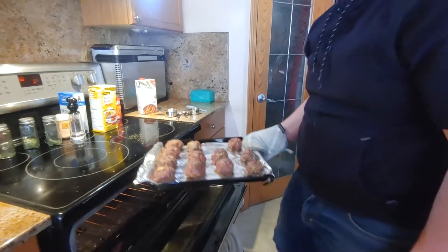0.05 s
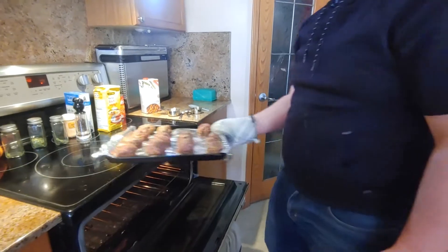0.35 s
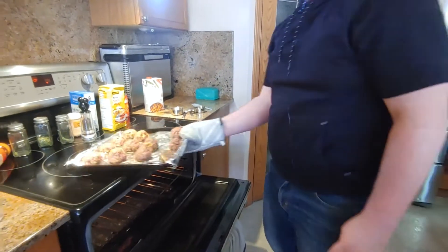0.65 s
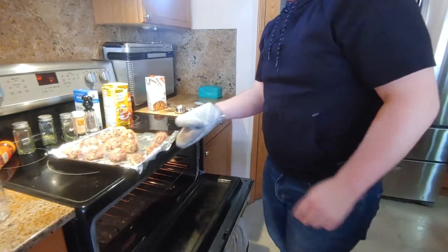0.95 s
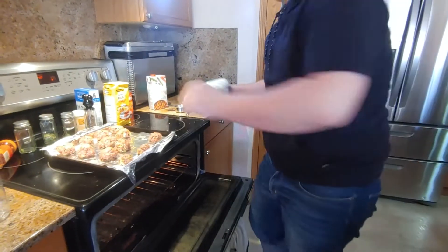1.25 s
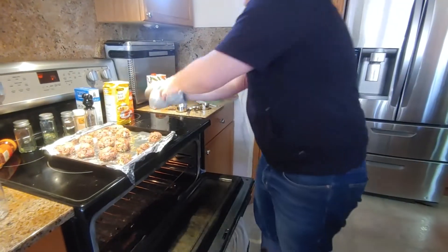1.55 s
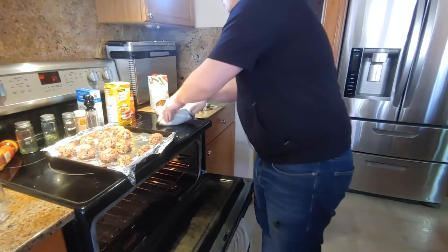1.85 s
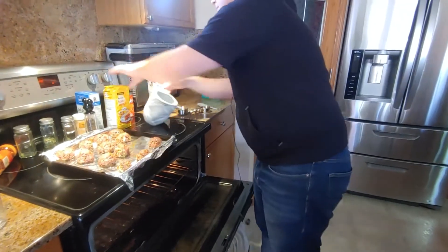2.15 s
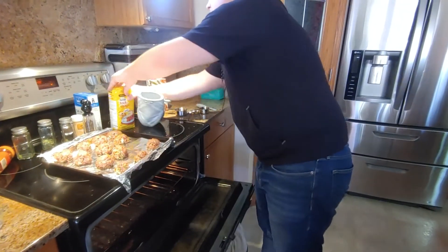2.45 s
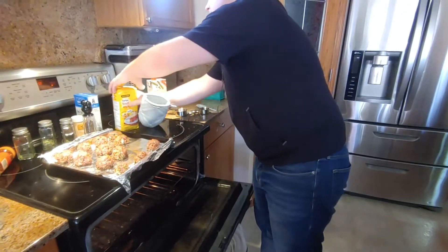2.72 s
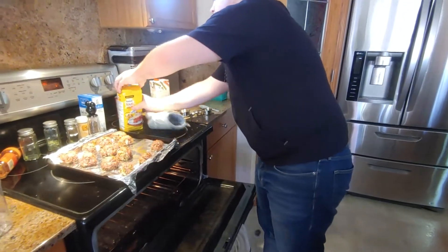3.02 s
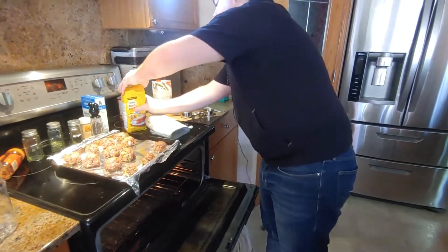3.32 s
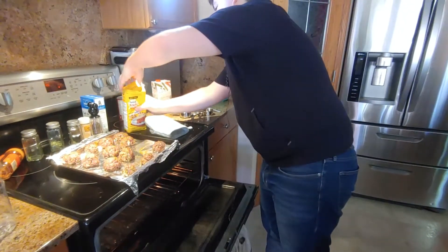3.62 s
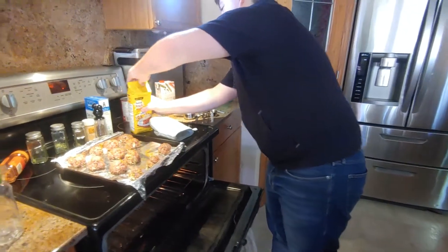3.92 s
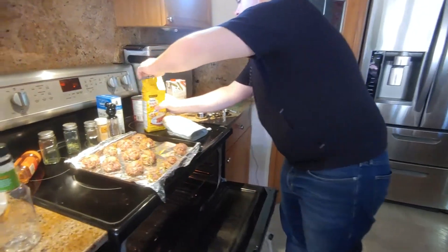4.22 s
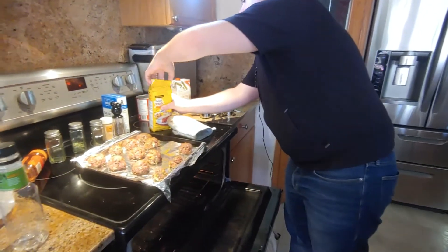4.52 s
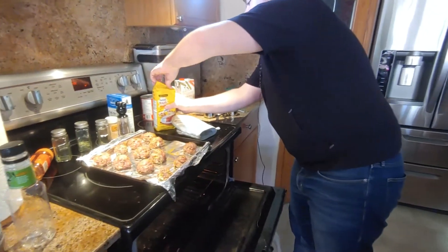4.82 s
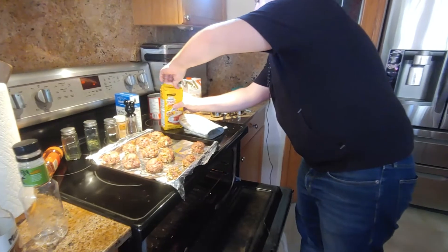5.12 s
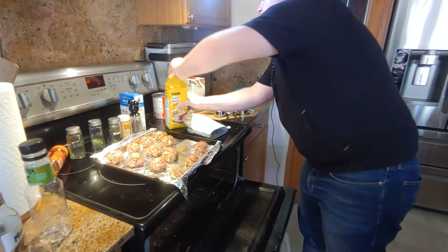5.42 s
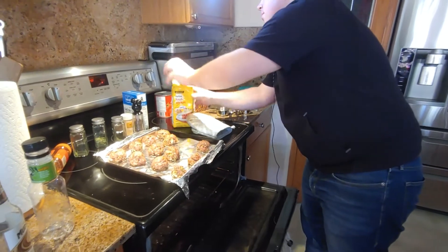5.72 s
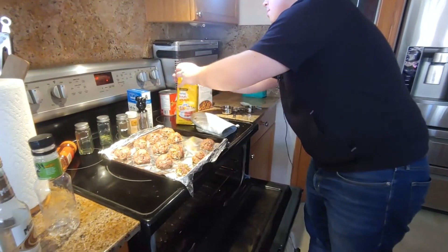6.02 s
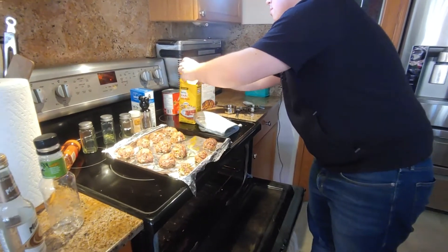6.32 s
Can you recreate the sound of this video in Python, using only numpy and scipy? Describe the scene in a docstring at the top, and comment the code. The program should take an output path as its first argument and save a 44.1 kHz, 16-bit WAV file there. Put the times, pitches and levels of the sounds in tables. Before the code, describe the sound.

In a kitchen, a foil-lined tray clanks and slides, followed by soft thuds and the crackling and ripping of a cardboard flap.

```python
"""In a small kitchen, a foil-lined baking tray is set down on a glass hob, slid back and let go.
Its steel rattles and rings, and the foil crinkles. An oven mitt is pulled off with a rustle and
dropped with a thud. Then a cardboard box is gripped and rubbed; its flap snaps as it creases and
tears open in short rips, fibre by fibre. The oven fan runs underneath and the room echoes."""
import sys
import numpy as np
from scipy import signal
from scipy.fft import rfft, irfft, next_fast_len
from scipy.io import wavfile
from scipy.ndimage import map_coordinates

SR = 44100
rng = np.random.default_rng(int(sys.argv[2]) if len(sys.argv) > 2 else 0)


def materialize(psi):
    """Save the field psi as 16-bit PCM at rate SR to the path in sys.argv[1].

    A 1-D psi becomes a single channel; in a 2-D psi each row is a channel.
    """
    bounded = np.clip(np.atleast_2d(psi).T, -1, 1)
    quanta = np.round(bounded * 32767).astype(np.int16)
    wavfile.write(sys.argv[1], SR, quanta)


N = 289334

# Levels are relative: each source adds its own gain. A decay (t60) is the time to fade by 60 dB.
# The tray hits the hob. Each row: time in seconds, level in dB, treble in dB,
# rattle decay in seconds, ring in dB, pitch in Hz that the contact point favours.
TRAY_HITS = [(0.6296, 6, 0, 0.022, -8, 2200), (0.639, -12, -2, .09, -7, 2900),
             (.6900, 1, 3.5, 0.052, -6, 850), (0.7397, -1, -8, 0.016, -1, 695),
             (.797, -14.5, -3, 0.3, -4, 2800), (1.0059, 1, 7, 0.041, 1, 860),
             (1.015, -6, -3, 0.14, -2, 1250), (1.052, -17.5, -3, 0.12, 14.5, 1230),
             (1.1652, -9.5, 0, 0.12, -2, 1260)]
# The steel's ringing tones. Each row: pitch in Hz, level in dB, decay in seconds.
TRAY_MODES = [(266.4, -2, 0.24), (351, 0.5, 0.12), (434.5, -2, 0.42), (494, -7, 0.26), (540, -26, 0.27),
              (706, -3, 0.4), (805, -0.5, 0.31), (846, 8, 0.055), (1030, -11, 0.14), (990, -5, 0.36),
              (1164, -1, 0.23), (1220, 8.5, 0.11), (1330, -11, 0.33), (1700, -17, 0.48), (1970, -9, 0.4),
              (2245, -15, 0.31), (2930, -20, 0.2), (3370, -1, 0.12), (3580, -15, 0.17)]
# The foil flexes as the tray lands, stops and is let go. Each row: time in seconds, level in dB,
# fade in seconds.
FOIL_FLEXES = [(.64, -30.5, 0.12), (1.009, -22, 0.054), (1.2, -33, 0.056)]
# The card buckles. Each row: time in seconds, crack, flap ring and treble in dB, decay in seconds.
SNAPS = [(3.034, -20.5, -25.5, 1, 0.033), (3.052, -19.5, -22.5, -1, .025), (3.095, -30.5, -39, 16, 0.034),
         (3.151, -27.5, -35.5, 2, 0.067), (3.322, -28, -27, -6, 0.053), (3.392, -35, -28, -14, 0.037),
         (3.4663, -21.5, -30, 15, 0.054), (3.489, -23, -24, -4, 0.05), (3.524, -20, -15.5, -15, 0.03),
         (3.562, -18.5, -19, -24, 0.043), (3.697, -22.5, -35, -8, 0.04), (3.77, -24, -22, -11, 0.066),
         (3.848, -19.5, -24, 2, 0.029), (3.856, -14, -22, 10, .02), (3.918, -24.5, -36, -24, 0.029),
         (3.959, -15, -23.5, -1, 0.03), (3.975, -18, -25, -8, .03), (4.022, -19.5, -17, -6, 0.037),
         (4.227, -34, -51, -4, 0.044), (4.398, -25.5, -27, -14, 0.028), (4.418, -21.5, -18, -8, 0.031),
         (4.457, -21, -23, -7, 0.052), (4.475, -25, -30, -10, .035), (4.485, -17.5, -25, 0, 0.0091),
         (4.524, -17.5, -21, -15, 0.024), (4.56, -22, -22.5, -12, 0.014), (4.602, -23.5, -26, -20, 0.062),
         (4.628, -19, -26, -10.5, 0.094), (4.787, -29.5, -34.5, -6, 0.095), (4.824, -22, -47, -2, 0.035),
         (4.838, -29, -32, -2, 0.038), (5.004, -22.5, -24.5, -11, 0.11), (5.038, -20, -37, 4, 0.043),
         (5.054, -21, -47, 12, 0.015), (5.322, -20, -19.5, -19, .035), (5.335, -16, -16.5, 2, 0.042),
         (5.411, -27.5, -17.5, -25, 0.034), (5.5005, -20, -30, 1, 0.023), (5.537, -20, -27.5, -8, 0.032),
         (5.629, -26, -31.5, -7, 0.029), (5.887, -23, -25, -11, 0.041), (6.025, -27, -29, -17, 0.023),
         (6.098, -30.5, -21, 2, 0.078), (6.108, -21, -26, -24, 0.021), (6.241, -21, -19.5, -6, 0.039),
         (6.252, -15, -18.5, -12, 0.028), (6.3238, -25, -25.5, 14, 0.011), (6.35, -22.5, -23.5, 6, 0.1),
         (6.404, -23.5, -31, -10, 0.014), (6.428, -12.5, -29, -15, 0.026), (6.452, -27, -23.5, -2, 0.026),
         (6.495, -23, -25, -20, .02), (6.521, -24, -36, -1, .027)]
# The glued flap tears. Each row: start and end in seconds, level in dB, pull on the box in dB.
RIPS = [(3.489, 3.542, -14.5, -7.5), (3.718, 3.995, -32, -21), (3.958, 3.976, -20.5, -16),
        (5.001, 5.042, -21.5, -12), (5.092, 5.294, -24, -26), (5.127, 5.133, -15.5, -22),
        (5.201, 5.237, -16.5, -42), (5.309, 5.375, -22, -8), (5.313, 5.343, -28.5, -4)]
# Fingers tap the box. Each row: time in seconds, flap ring in dB, hollow knock in dB.
TAPS = [(2.502, -37, -34), (2.5445, -24, -35.5), (2.568, -29, -52), (2.691, -26.5, -37),
        (2.832, -34.5, -48), (2.982, -31, -44), (3.109, -24.5, -28), (3.157, -29, -27), (3.184, -26.5, -39),
        (3.865, -41, -26.5), (4.049, -28, -41), (4.078, -23.5, -29), (4.121, -43, -27), (4.513, -41, -26.5),
        (4.978, -35, -54), (5.727, -34, -31), (5.779, -23.5, -33), (6.055, -29, -41)]
# Fingers drag over the card. Each row: start and end in seconds, rub in dB, scratch in dB.
STROKES = [(2.421, 2.896, -45.5, -44), (3.014, 3.056, -35, -42), (3.327, 3.43, -46, -38),
           (3.631, 3.659, -43, -47), (3.711, 4.031, -35.5, -31), (4.444, 4.666, -37, -36.5),
           (4.788, 4.903, -41.5, -38), (4.95, 4.998, -39.5, -39), (5.012, 5.189, -54, -33),
           (5.208, 5.258, -37.5, -24.5), (5.305, 5.457, -39.5, -34.5), (5.537, 5.622, -39.5, -39),
           (5.715, 5.797, -34.5, -34), (5.831, 5.894, -44, -32), (6.057, 6.283, -36, -39),
           (6.347, 6.537, -30.5, -37.5)]
HOLDING_STROKE = (2.5, 6.56, -53.5, -45.5)  # one long, faint row: the hands never keep still
# Soft bumps of mitt, hands and box. Each row: time in seconds, level in dB, pitch in Hz,
# puff decay in seconds.
BUMPS = [(.062, -29, 101, .09), (0.138, -24.5, 175, 0.15), (1.031, -21, 200, 0.08), (1.187, -13, 141, .11),
         (1.316, -17.5, 116, .065), (1.69, -12.5, 345, 0.24), (1.697, -12, 118, 0.22),
         (1.699, -16.5, 650, 0.061), (1.877, -13, 785, 0.12), (2.092, -22.5, 58, .1),
         (2.546, -12, 282, 0.077), (3.065, -37, 107, .25), (3.158, -16.5, 363, 0.24),
         (4.634, -20, 112, 0.059)]
# Tugs at the mitt. Each row: time in seconds, level in dB, swell and fade time in seconds.
MITT_TUGS = [(1.3, -35.5, 0.017), (1.58, -33.5, 0.1), (1.889, -35, 0.077), (2.33, -39.5, 0.16)]
# Sharp little ticks as mitt and clothes move. Each row: time in seconds, level in dB.
CLOTH_TICKS = [(0.083, -16), (.449, -18), (1.3175, -5), (1.525, -16), (1.563, -15), (1.579, -12.5),
               (1.597, -21), (1.633, -22), (2.117, -20)]

# How loudness changes. Each row: time in seconds, level in dB.
SLIDE_LEVEL = [(.78, -48), (.84, -37), (.9, -21), (.96, -24), (1.0, -15.5), (1.04, -27), (1.13, -31),
               (1.22, -51)]
RUMBLE_LEVEL = [(0.0, -46), (0.55, -49), (1.11, -45.5), (2.57, -46), (2.98, -44), (4.13, -52.5),
                (4.68, -49.5), (5.37, -53.5), (5.79, -45.5), (6.56, -56)]

# Modes are the pitches a thing rings at. Each row: pitch in Hz, width in Hz, level in dB.
SLIDE_MODES = [(357, 37, -17), (520, 58, -4.5), (717, 55, 4), (810, 34, -8), (1090, 340, -21),
               (2500, 420, -25)]  # tray sliding on glass
BOX_MODES = [(258, 42, 10), (399, 165, 15), (537, 34, 9.5)]  # hollow box
PANEL_MODES = [(925, 28, 3.5), (1185, 120, -22.5), (1522, 14, 5.5), (3130, 73, -9), (3595, 120, 0),
               (5500, 23, -3), (6860, 57, -50)]  # card walls
FLAP_MODES = [(958, 280, 8), (1145, 150, -6), (1370, 150, -5), (1582, 108, 1.5), (2013, 76, 2)]  # box flap
TORN_EDGE_MODES = [(2660, 310, 6), (3600, 350, -6), (4900, 480, 15), (5930, 1700, 4), (7600, 820, -17),
                   (10800, 2600, 4)]

# A colour is a sound's balance from bass to treble. Each row: frequency in Hz, level in dB.
CLANK_COLOUR = [(40, -23), (140, -2.5), (230, -1.5), (430, 2), (780, 4.5), (1250, -2.5), (1900, -4.5),
                (2900, -5.5), (3700, -9.5), (5000, -17.5), (9000, -27), (16000, -36)]  # steel on glass
FOIL_COLOUR = [(900, 0.5), (2500, -0.5), (5000, -1.5), (7200, 3), (9500, -7.5), (12000, -1), (16000, -20.5)]
SNAP_COLOUR = [(400, -69), (1200, -27), (2300, -3.5), (3600, 1), (5800, 5), (8000, -3), (11000, -5),
               (16000, -18)]
RIP_COLOUR = [(100, -47), (250, -39), (450, -10), (650, -23), (1000, -3.5), (2300, -7), (4000, -3),
              (6000, 2), (8200, -3.5), (11000, -5.5), (16000, -11)]
RUB_COLOUR = [(150, -19), (350, 7.5), (650, -2), (1000, 4.5), (1600, 2.5), (3000, 1), (8000, -47)]
SCRATCH_COLOUR = [(1200, -21.5), (3500, 4.5), (5600, 13), (8000, 4.5), (11000, 5), (16000, -8)]
CLOTH_COLOUR = [(700, 2), (1800, -1), (4000, -1.5), (6800, -3.5), (9000, -9), (12000, -18), (16000, -39)]
TICK_COLOUR = [(700, -6), (4500, -1), (7000, 4.5), (9500, -6.5), (16000, -25.5)]
FAN_COLOUR = [(40, -15), (100, -10.5), (200, -11.5), (350, -14), (700, 0), (1100, -4.5), (2200, -19.5),
              (3500, -14.5), (6000, -11), (10000, -14), (14000, -50), (16000, -40)]
RUMBLE_COLOUR = [(20, 2), (60, -0.5), (130, -2), (220, -10.5), (330, -4), (600, -14), (1500, -25)]

# How long the kitchen echoes. Each row: frequency in Hz, decay in seconds.
ROOM_DECAY = [(100, 0.43), (800, 0.22), (4000, 0.21), (14000, 0.1)]

KNOCK_DB = -13  # the box knocks more softly than the flap rings


def tray(ring_db=-12, clank_db=1, buzz_db=-22, buzz_t60=0.76, focus_db_per_octave=6):
    """Steel rattles briefly on glass at each hit; the sheet rings on and the foil buzzes with it."""
    out, t = np.zeros(N), np.arange(SR * 2 // 3) / SR
    for s, db, bright_db, t60, sheet_db, focus_hz in TRAY_HITS:
        rattle = rng.standard_normal(len(t)) * (dying(t, t60) + amp(buzz_db) * dying(t, buzz_t60))
        clank = amp(clank_db) * peaked(coloured(rattle, CLANK_COLOUR, bright_db))
        ring = np.zeros(len(t))
        for hz, mode_db, mode_t60 in TRAY_MODES:
            gain = amp(mode_db + rng.normal() - focus_db_per_octave * abs(np.log2(hz / focus_hz)))
            ring += gain * dying(t, mode_t60) * np.sin(2 * np.pi * (hz * t + rng.random()))
        add(out, s, amp(db) * (clank + amp(ring_db + sheet_db) * ring / 2))
    return out


def slide():
    """The tray judders over the glass, and the tiny slips make it sing."""
    slips = grains(per_s=840, spread_db=-0.5)
    return level_curve(SLIDE_LEVEL) * unit(resonate(slips, SLIDE_MODES))


def foil(crinkle_db=-1, carry_db=-36.5, fade_db_per_s=9, lands_s=0.63, swell_s=0.06):
    """The foil lining shivers while carried and crinkles at each jolt of the tray."""
    carried = amp(carry_db - fade_db_per_s * np.arange(N) / SR) * gesture(0, lands_s, swell_s, swell_s)
    flexes = [amp(db) * gesture(s, s, swell_s, fall_s) for s, db, fall_s in FOIL_FLEXES]
    crinkle = unit(coloured(grains(per_s=8200, spread_db=10), FOIL_COLOUR))
    return amp(crinkle_db) * np.max([carried] + flexes, axis=0) * crinkle


def snaps():
    """The card creaks under the thumbs, pops and springs back."""
    out = np.zeros(N)
    for s, crack_db, flap_db, bright_db, t60 in SNAPS:
        for delay_s, db in [(-0.011, -24.5), (0, 0), (0.0105, -13)]:  # creak, pop, rebound
            snap = buckle(crack_db, flap_db, flap_db + KNOCK_DB, flap_hz(s), bright_db, t60)
            add(out, s + delay_s, amp(db) * snap)
    return out


def buckle(crack_db, flap_db, knock_db, focus_hz, bright_db, t60, attack_s=0.00024, plain_bright_db=-8):
    """A crease cracks and its fibres settle; the flap rings and the hollow box knocks."""
    t = np.arange(SR // 12) / SR
    spike = amp(5) * dying(t, t60=0.0014)
    settling = amp(-19) * dying(t, t60=0.024)
    strain = spike + dying(t, t60) + settling
    fibres = rng.standard_normal(len(t)) * strain * (1 - np.exp(-t / attack_s))
    crack = coloured(fibres, SNAP_COLOUR, bright_db - plain_bright_db)
    crease_hz = 4000 * np.exp(0.29 * rng.normal())  # each crease has its own pitch
    crack = card_panels(crack) + resonate(crack, [(crease_hz, 450, 5)])
    flap = resonate(fibres, gripped(FLAP_MODES, spread_db=6.5, detune=0.037))
    flap = resonate(flap, [(focus_hz, 650, 0)])
    knock = resonate(fibres, gripped(BOX_MODES, spread_db=8, detune=0.07))
    knock = resonate(knock, [(450, 230, 0)])
    return amp(crack_db) * struck(crack) + amp(flap_db) * struck(flap) + amp(knock_db) * struck(knock)


def flap_hz(s, shut_hz=1016, open_hz=1490, opens_s=5.95):
    """The flap rings higher once it is free."""
    return shut_hz if s < opens_s else open_hz


def gripped(modes, spread_db, detune):
    """The grip shifts each mode's pitch and strength, at random for each blow."""
    return [(hz * np.exp(detune * rng.normal()), width, db + spread_db * rng.normal())
            for hz, width, db in modes]


def card_panels(x):
    """The card's panels ring along with whatever shakes them."""
    return x + resonate(x, PANEL_MODES)


def rips(rise_s=0.0027, fall_s=0.0058, knock_db=-5):
    """Each short rip parts the fibres and shakes the flap and box."""
    tear = tearing()
    tugs = grains(per_s=450, spread_db=6)
    body = resonate(tugs, FLAP_MODES) + amp(knock_db) * resonate(tugs, BOX_MODES)
    body = unit(resonate(body, [(960, 1500, 0)]))
    return sum(amp(db) * gesture(start, end, rise_s, fall_s) * (tear + amp(body_db) * body)
               for start, end, db, body_db in RIPS)


def tearing(shift_db=6, shifts_per_s=45):
    """Fibres break by the thousand; the torn edge changes colour as the tear travels."""
    breaks = coloured(grains(per_s=3200, spread_db=4), RIP_COLOUR)
    edge = np.zeros(N)
    for mode in TORN_EDGE_MODES:
        drift = np.clip(wobble(shifts_per_s), -2, 2)
        edge += resonate(breaks, [mode]) * amp(shift_db * (drift - 4.5))
    return unit(card_panels(breaks) + edge)


def taps(crack_db=-38.5, bright_db=-7, t60=0.038):
    """Fingers shift their grip: soft skin sounds the flap and box but hardly cracks the card."""
    out = np.zeros(N)
    for s, flap_db, knock_db in TAPS:
        add(out, s, buckle(crack_db, flap_db, knock_db, flap_hz(s), bright_db, t60))
    return out


def fingers(gain_db=-1):
    """Fingertips drag over the box with a low rub and a high scratch."""
    rub_level, scratch_level = np.zeros(N), np.zeros(N)
    for start, end, rub_db, scratch_db in STROKES + [HOLDING_STROKE]:
        stroke = gesture(start, end, rise_s=0.013, fall_s=0.044)
        rub_level = np.maximum(rub_level, amp(rub_db) * stroke)
        scratch_level = np.maximum(scratch_level, amp(scratch_db) * stroke)
    rub = unit(card_panels(coloured(grains(per_s=900, spread_db=5.5), RUB_COLOUR)))
    scratch = unit(card_panels(coloured(grains(per_s=2500, spread_db=7.5), SCRATCH_COLOUR)))
    return amp(gain_db) * (rub_level * rub + scratch_level * scratch)


def crackle(per_s=28, gain_db=1.5, spread_db=3.5, bright_db=-7, flap_db=-1, t60=0.029):
    """Small creases give at random under each stroke, louder when the stroke is firm."""
    out = np.zeros(N)
    for start, end, rub_db, scratch_db in STROKES:
        for slot in np.arange(start, end, 1 / per_s):
            s = rng.uniform(slot, min(slot + 1 / per_s, end))
            size = amp(gain_db + spread_db * rng.normal())
            crease = buckle(scratch_db, rub_db + flap_db, rub_db + KNOCK_DB, flap_hz(s), bright_db, t60)
            add(out, s, size * crease)
    return out


def bumps(damping=0.98, puff_db=-6, push_db=-1, push_cycles=3):
    """Each padded blow is a dull push that dies in a few cycles, plus a puff of noise."""
    out, t = np.zeros(N), np.arange(SR // 3) / SR
    for s, db, hz, t60 in BUMPS:
        body = [(hz, damping * hz, 0)]
        push = np.sin(2 * np.pi * hz * t) * dying(t, push_cycles / hz) * (1 - np.exp(-2 * hz * t))
        burst = rng.standard_normal(len(t)) * dying(t, t60)
        puff = resonate(resonate(burst, body), body)
        add(out, s, amp(db) * (amp(push_db) * peaked(push) + amp(puff_db) * peaked(puff)))
    return out


def mitt(cloth_db=-1, tick_db=1, tick_t60=0.0048):
    """Cloth drags over the hand at each tug, with a few sharp ticks."""
    drag = sum(amp(db) * gesture(s, s, swell, swell) for s, db, swell in MITT_TUGS)
    out = amp(cloth_db) * drag * unit(coloured(grains(per_s=10000, spread_db=11.5), CLOTH_COLOUR))
    t = np.arange(SR // 20) / SR
    for s, db in CLOTH_TICKS:
        burst = rng.standard_normal(len(t)) * dying(t, tick_t60)
        add(out, s, amp(db + tick_db) * peaked(coloured(burst, TICK_COLOUR)))
    return out


def oven_fan(fan_db=-44, rumble_db=6):
    """The fan's steady rush of air, over a low rumble that slowly rises and falls."""
    rush = unit(coloured(rng.standard_normal(N), FAN_COLOUR))
    rumble = unit(coloured(rng.standard_normal(N), RUMBLE_COLOUR))
    return amp(fan_db) * rush + amp(rumble_db) * level_curve(RUMBLE_LEVEL) * rumble


def kitchen_echo(x, delay_s=0.006, patterns=8):
    """The room echoes: treble dies first, and the echo pattern shifts as the cook moves."""
    out = np.zeros(N)
    for k in range(patterns):
        hz, t, noise = signal.stft(rng.standard_normal(SR // 2), SR, nperseg=256)
        fade = np.exp(-np.log(1000) * t / along(ROOM_DECAY, hz)[:, None])
        tail = signal.istft(noise * fade, SR, nperseg=256)[1]
        start, end = k * N // patterns, (k + 1) * N // patterns
        add(out, start / SR + delay_s, signal.fftconvolve(x[start:end], tail / np.linalg.norm(tail)))
    return out


def amp(db):
    """Turn decibels into a gain."""
    return 10 ** (np.asarray(db) / 20)


def unit(x):
    """Scale to an average level (rms) of 1."""
    return x / np.sqrt(np.mean(x ** 2) + 1e-20)


def peaked(x):
    """Scale to a peak of 1."""
    return x / (np.abs(x).max() + 1e-20)


def struck(x, window_s=0.0098):
    """Scale a blow so its first moments have an average level of 1."""
    return x / np.sqrt(np.mean(x[:round(window_s * SR) + 1] ** 2) + 1e-20)


def along(points, hz):
    """Read between (Hz, value) points on a log frequency scale."""
    known_hz, values = np.transpose(points)
    return np.interp(np.log(hz + 1), np.log(known_hz + 1), values)


def level_curve(rows):
    """Join (seconds, dB) rows into one gain per sample, silent outside them."""
    s, db = np.transpose(rows)
    return amp(np.interp(np.arange(N) / SR, s, db, left=-120, right=-120))


def gesture(start, end, rise_s, fall_s):
    """A gain that swells up to start, holds, and dies away after end."""
    t = np.arange(N) / SR
    return np.exp(np.minimum(t - start, 0) / rise_s - np.maximum(t - end, 0) / fall_s)


def dying(t, t60):
    """Fade by 60 dB every t60 seconds."""
    return np.exp(-np.log(1000) * t / max(t60, 1e-4))


def grains(per_s, spread_db):
    """Tiny slips: clicks at random times and of random sizes."""
    sizes = amp(spread_db * np.clip(rng.standard_normal(N), -2, 2)) * rng.choice([-1, 1], N)
    return unit(sizes * (rng.random(N) < per_s / SR))


def wobble(per_s):
    """A wandering line through random points."""
    points = rng.standard_normal(int(N * per_s / SR) + 4)
    return map_coordinates(points, [np.arange(N) * per_s / SR], order=1)


def add(track, s, sound):
    """Mix a sound in at s seconds."""
    part = track[max(round(s * SR), 0):][:len(sound)]
    part += sound[:len(part)]


def coloured(x, colour, bright_db=0, treble_hz=6500.0):
    """Give x a colour, with the treble turned up or down by bright_db."""
    size = 2 * next_fast_len(len(x) // 2 + 1024, True)
    hz = np.fft.rfftfreq(size, 1 / SR)
    treble = hz ** 4 / (hz ** 4 + treble_hz ** 4)
    cepstrum = irfft(np.log(amp(along(colour, hz) + bright_db * treble)))
    # Fold the filter forward in time, so nothing sounds before the hit.
    cepstrum[1:size // 2] *= 2
    cepstrum[size // 2 + 1:] = 0
    return irfft(rfft(x, size) * np.exp(rfft(cepstrum)))[:len(x)]


def resonate(x, modes):
    """Let x ring through modes. Each row: pitch in Hz, width in Hz, level in dB."""
    size = 2 * next_fast_len(len(x) // 2 + 1024, True)
    f = np.fft.rfftfreq(size, 1 / SR)
    response = sum(amp(db) * 1j * f * width / (hz * hz - f * f + 1j * f * width)
                   for hz, width, db in modes)
    return irfft(rfft(x, size) * response, size)[:len(x)]


def scene(tray_room_db=-10, box_room_db=-13, soft_room_db=-16):
    """Mix tray, mitt, box, echo and fan into one channel."""
    hob = tray() + slide()
    soft = bumps() + mitt() + foil()
    box = snaps() + taps() + rips() + fingers() + crackle()
    room = kitchen_echo(amp(tray_room_db) * hob + amp(box_room_db) * box + amp(soft_room_db) * soft)
    return (hob + soft + box + room + oven_fan())[None]


def record(dry, top_hz=15800):
    """Round off the loudest peaks and cut the very highest treble."""
    rounded = dry / (1 + np.abs(dry) ** 6) ** (1 / 6)
    size = next_fast_len(N + 4096)
    kept = np.fft.rfftfreq(size, 1 / SR) < top_hz
    return irfft(rfft(rounded, size) * kept, size)[:, :N]


dry = scene()
out = record(dry)
materialize(out)
```